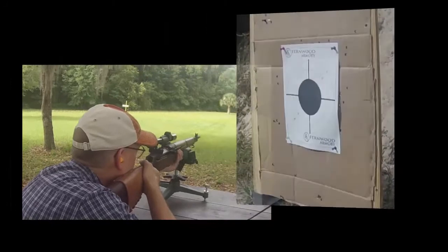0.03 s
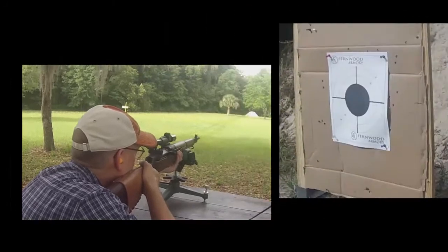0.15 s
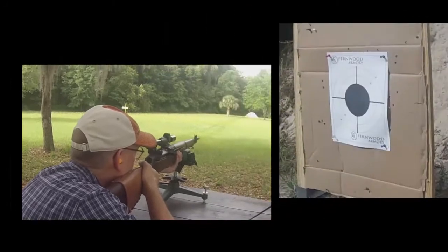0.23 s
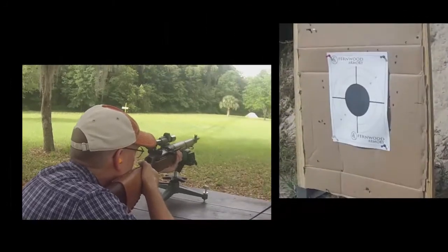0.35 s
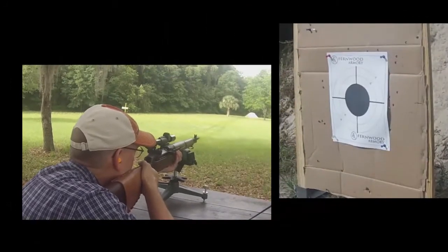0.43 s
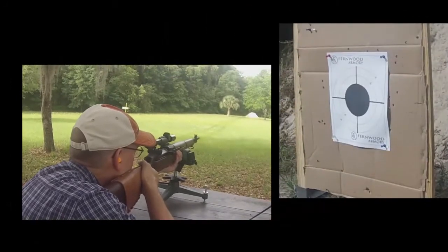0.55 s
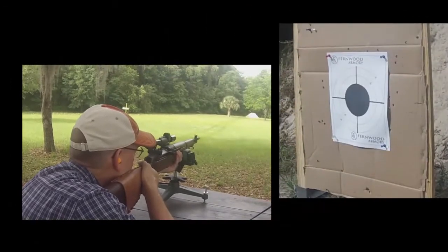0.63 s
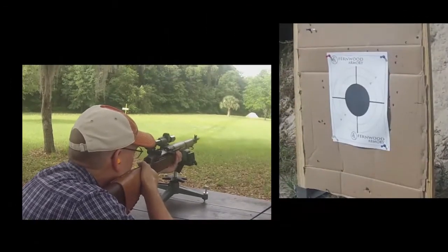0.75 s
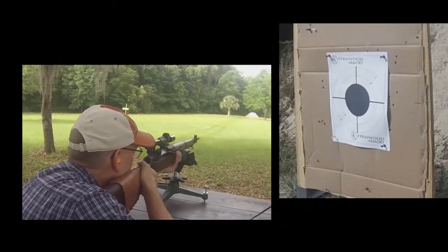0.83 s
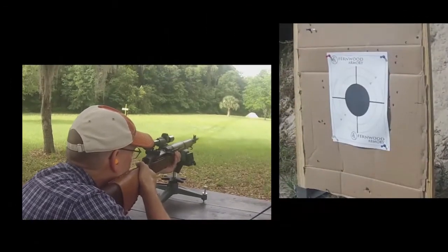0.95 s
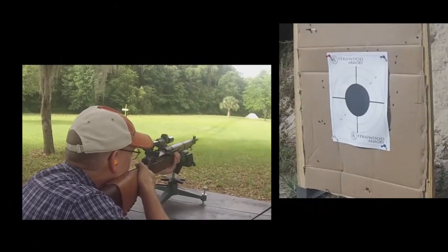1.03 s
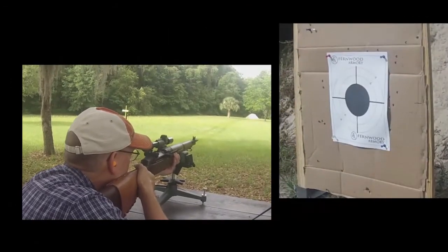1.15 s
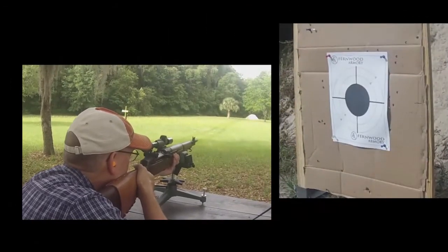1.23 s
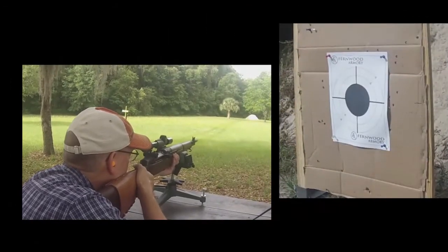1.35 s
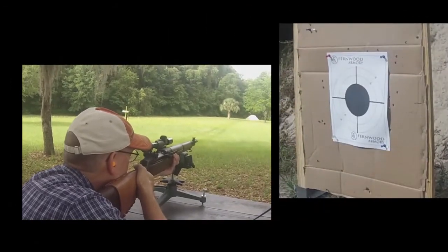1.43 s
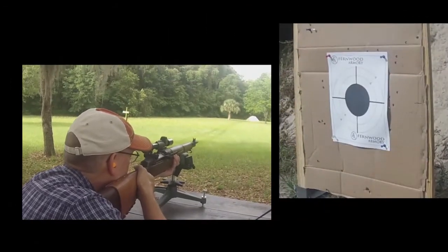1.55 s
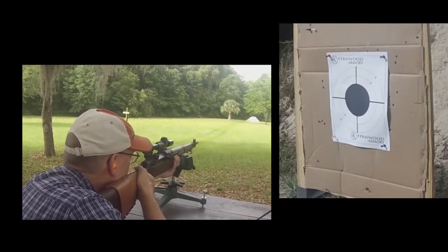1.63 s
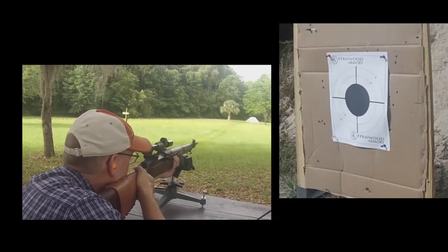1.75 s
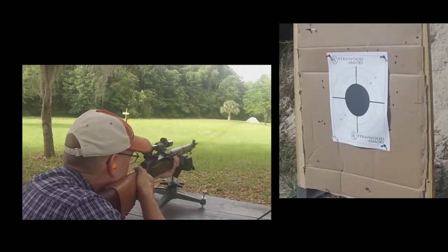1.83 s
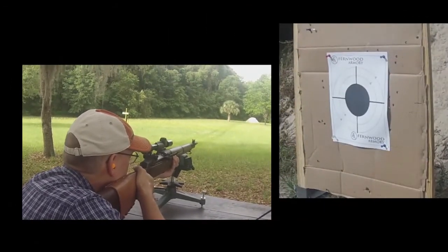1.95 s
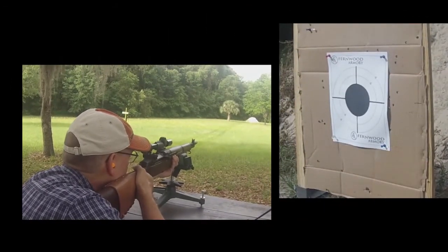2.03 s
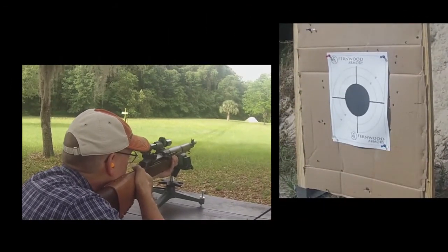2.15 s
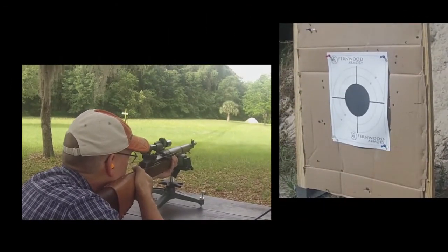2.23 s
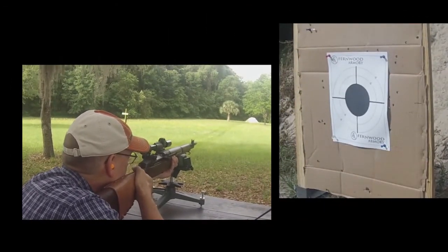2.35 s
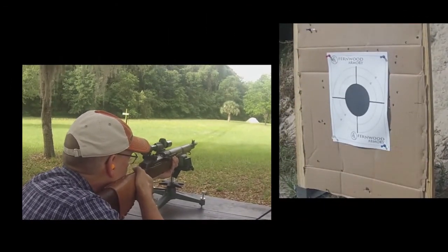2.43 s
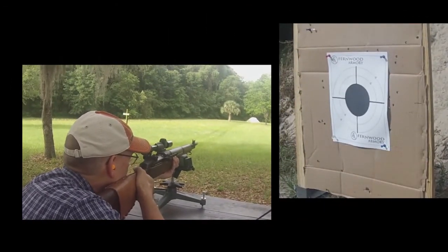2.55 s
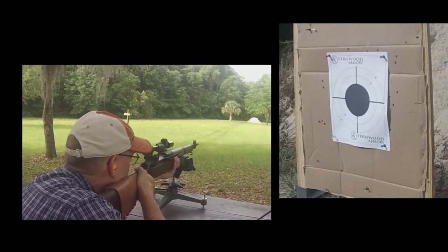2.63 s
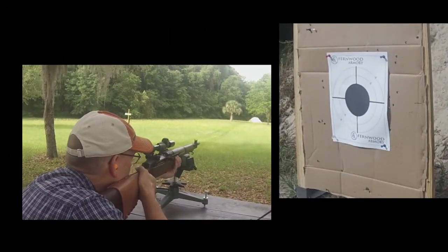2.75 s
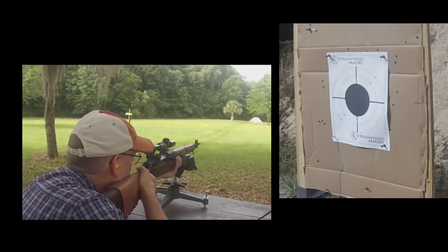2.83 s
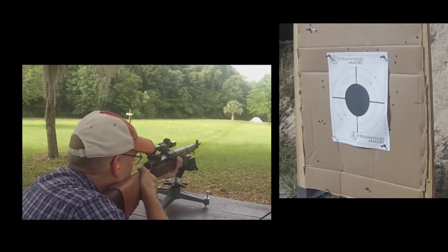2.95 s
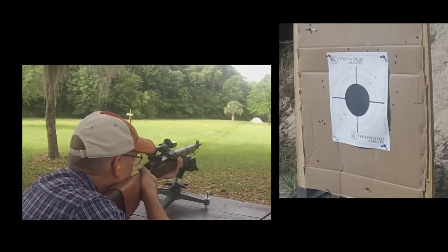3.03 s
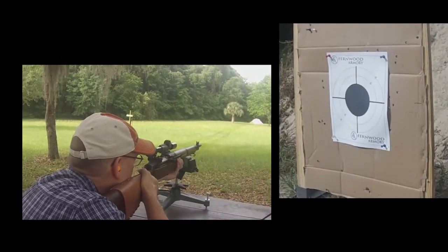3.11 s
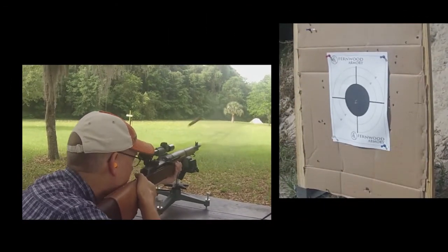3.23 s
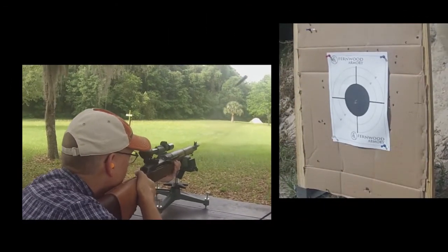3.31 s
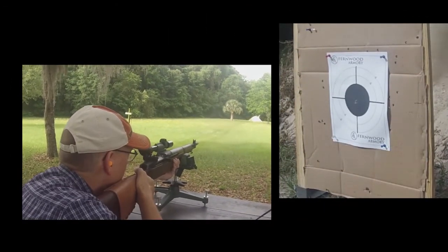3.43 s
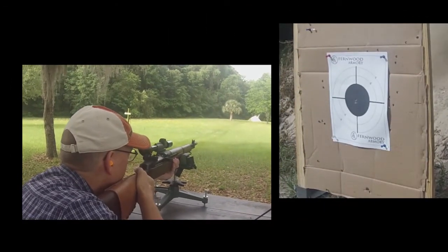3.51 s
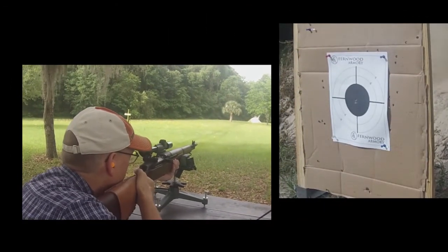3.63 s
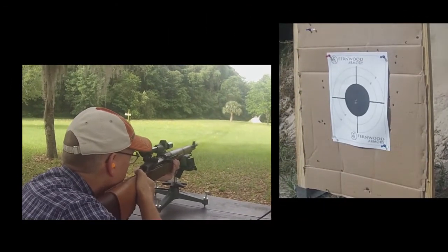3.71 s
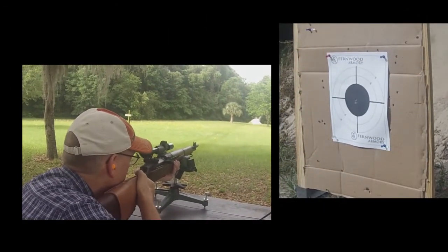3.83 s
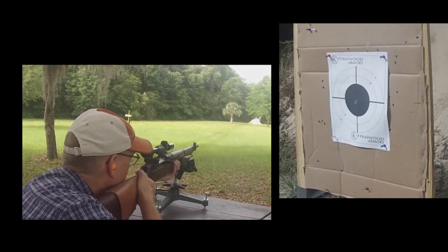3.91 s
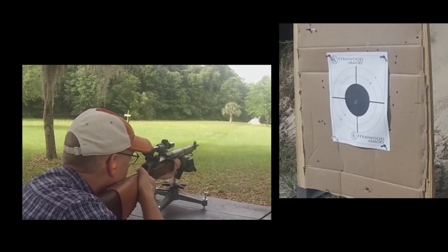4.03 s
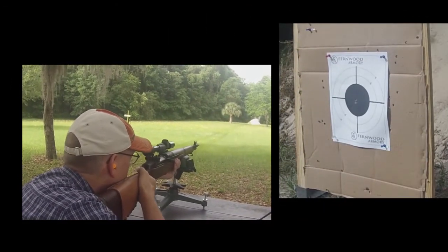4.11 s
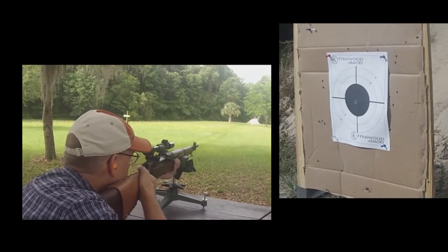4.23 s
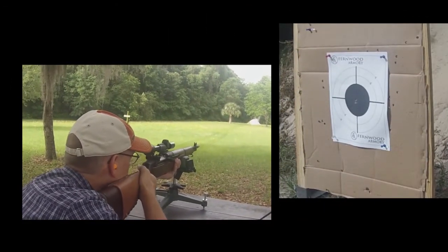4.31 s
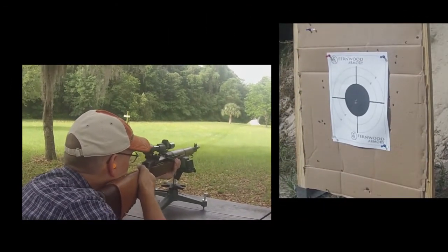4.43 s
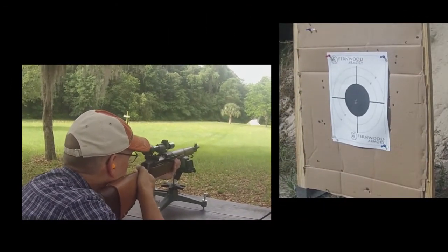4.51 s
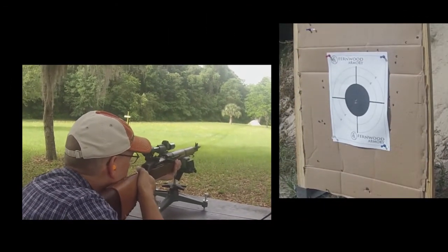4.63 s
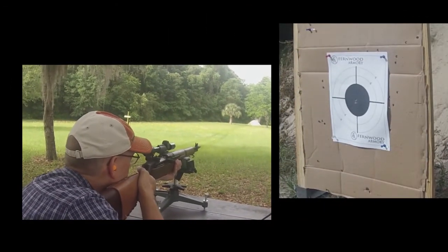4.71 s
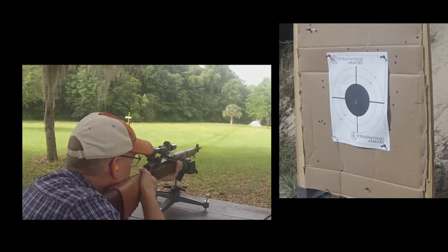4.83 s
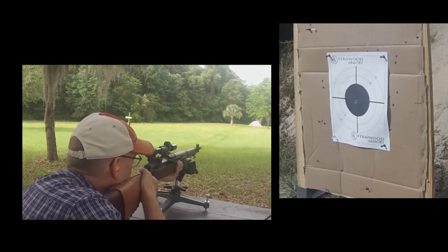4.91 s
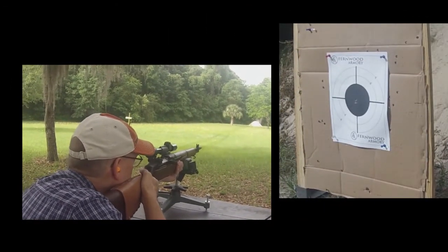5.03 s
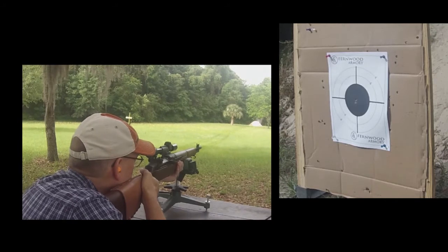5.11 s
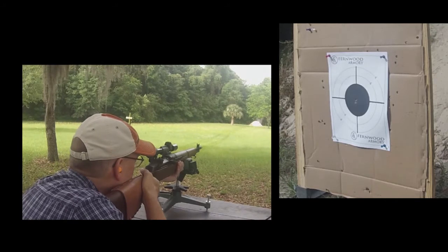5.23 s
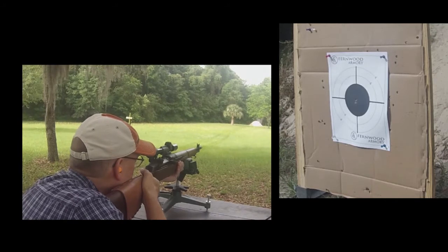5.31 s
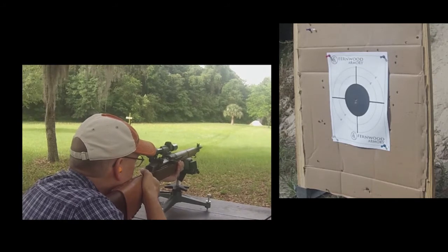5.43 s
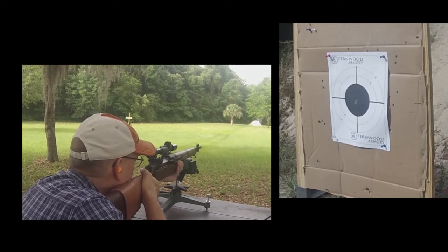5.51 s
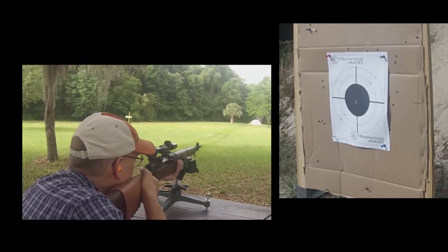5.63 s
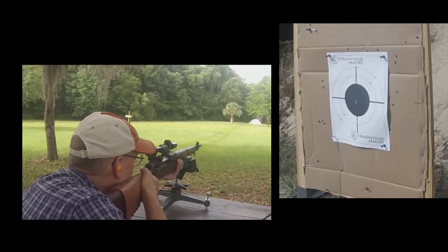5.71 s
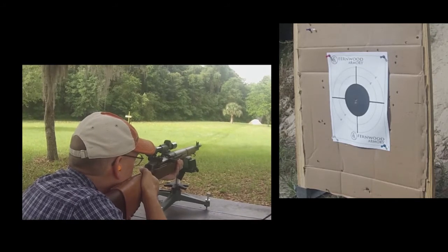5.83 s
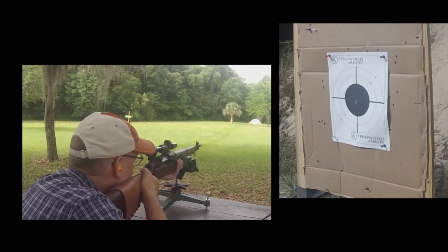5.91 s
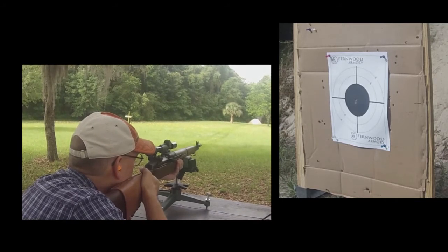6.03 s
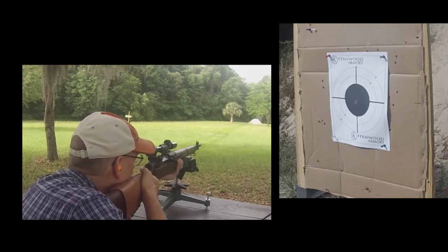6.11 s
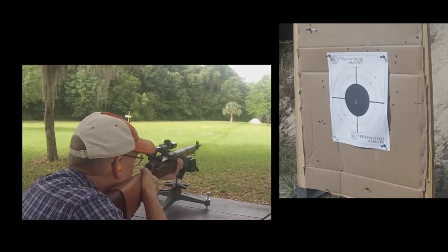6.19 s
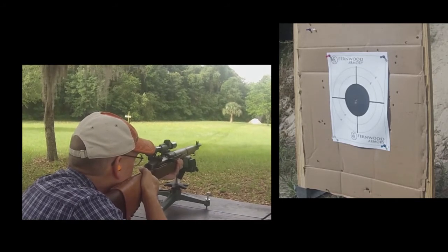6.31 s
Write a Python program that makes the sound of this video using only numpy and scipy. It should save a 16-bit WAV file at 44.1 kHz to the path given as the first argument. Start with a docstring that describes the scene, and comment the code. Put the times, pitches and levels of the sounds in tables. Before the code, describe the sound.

A single rifle shot cracks outdoors and rolls away in a long echo, with faint birdsong before it and small metal clicks after.

```python
"""Rifle shot at an open range

One shot from a bench: the blast overloads the microphone, a sharp crack follows, and the woods
scatter it back in a long roll that the air dulls. Before it a small bird sings and something knocks
on cardboard; the rifle's steel action clicks once before and several times after.
Under it all lie a low rumble, far birds and a faint insect."""
import sys
import numpy as np
from scipy import signal
from scipy.fft import rfft, irfft, next_fast_len
from scipy.io import wavfile

SR = 44100
rng = np.random.default_rng(int(sys.argv[2]) if len(sys.argv) > 2 else 0)


def log_audio(samples):
    """Write samples as a 16-bit WAV file to the path given in sys.argv[1]."""
    # one column per channel
    frames = np.atleast_2d(samples).T
    # limit to full scale, then quantise
    limited = np.clip(frames, -1, 1)
    pcm = np.round(limited * 32767).astype(np.int16)
    wavfile.write(sys.argv[1], SR, pcm)


N = 280476
T = np.arange(N) / SR
BURST_SAMPLES = SR // 4


def undb(db):
    """Decibels to gain."""
    return 10 ** (np.asarray(db) / 20)


def colour(x, points):
    """Filter by a (Hz, dB) spectrum, rolled off below 20 Hz, keeping the power of white noise."""
    hz, db = np.transpose(points)
    size = next_fast_len(len(x))
    f = np.maximum(np.fft.rfftfreq(size, 1 / SR), 1)
    gain = undb(np.interp(np.log(f), np.log(hz), db)) * f / np.hypot(f, 20)
    return irfft(rfft(x, size) * gain / np.sqrt(np.mean(gain ** 2)), size)[:len(x)]


def noise(points, size=BURST_SAMPLES):
    """Unit-level noise with a (Hz, dB) spectrum."""
    return colour(rng.standard_normal(size), points)


def walk(rate_hz):
    """Smooth random curve, spread near 1."""
    knots = rng.standard_normal(1024)
    return np.interp(T * rate_hz, np.arange(len(knots)), knots)


def fade(decay_ms, size=BURST_SAMPLES):
    """Exponential decay."""
    return np.exp(-T[:size] * 1000 / decay_ms)


def ring(modes):
    """Response of (frequency [Hz], level [dB], t60 [s]) modes to one blow."""
    t = T[:BURST_SAMPLES]
    return sum(undb(db - 60 * t / t60_s) * np.sin(2 * np.pi * hz * t) for hz, db, t60_s in modes)


def add(out, start_s, sound):
    """Mix a sound in at start_s."""
    i = int(start_s * SR)
    out[i:i + len(sound)] += sound[:N - i]


def field(level_db=-54, split_hz=260):
    """A low rumble stirs slightly under an even distant hiss."""
    # outdoor background: (frequency [Hz], relative density [dB])
    spectrum = [(12, -34.5), (20, 1.5), (180, -4.5), (259, -10), (306, -10.5), (342, -12.5), (404, -12),
                (505, -15.5), (549, -15.5), (788, -17.5), (906, -17), (1070, -20), (5090, -29.5),
                (11100, -37), (15500, -46.5)]
    air = undb(level_db) * noise(spectrum, N)
    rumble = signal.sosfiltfilt(signal.butter(2, split_hz, fs=SR, output="sos"), air)
    hiss = air - rumble
    return rumble * undb(.9 * walk(9)) + hiss * undb(.3 * walk(3))


def insect(pitch_hz=11383, waver_hz=120, pulse_hz=6, level_db=-82):
    """A thin high chirp in uneven pulses."""
    turns = pulse_hz * T + .3 * walk(3)
    tone = np.sin(2 * np.pi * np.cumsum(pitch_hz + waver_hz * walk(146.8)) / SR)
    return undb(level_db) * tone * np.maximum(np.sin(2 * np.pi * turns), 0)


def note(length_s, hz, glide_oct, bend_hz, arch=0):
    """A gliding tone and its rounded swell; arch makes the glide start fast and level off."""
    u = np.linspace(0, 1, int(length_s * SR))
    pitch_hz = hz * 2 ** (glide_oct * (u - .5 - 2 * arch * (u - .5) ** 2)) + bend_hz
    tone = np.sin(2 * np.pi * np.cumsum(pitch_hz) / SR)
    swell = np.sqrt(2 * np.abs(np.sin(np.pi * u)))
    return tone, swell


def whistle(length_s, hz, glide_oct, waver=.00803, arch=0):
    """A clear note that wavers slightly."""
    bend_hz = waver * hz * walk(147)[:int(length_s * SR)]
    tone, swell = note(length_s, hz, glide_oct, bend_hz, arch)
    return swell * tone


def buzz(length_s, hz, trill_hz, depth_hz, glide_oct=0, rise_db=0, rasp_db=-12):
    """A raspy note whose trill widens and firms up as it goes."""
    size = int(length_s * SR)
    u = T[:size] / length_s
    turns = np.cumsum(trill_hz * (1 + .2 * walk(60)[:size])) / SR
    bend = np.sqrt(u) * signal.sawtooth(2 * np.pi * turns, .25) + .3 * walk(500)[:size]
    tone, swell = note(length_s, hz, glide_oct, depth_hz * bend)
    rasp = noise([(.68 * hz, -40), (.8 * hz, -4), (hz, 0), (1.12 * hz, -7), (1.3 * hz, -40)], size)
    firmness = np.minimum(1, .5 + turns / 6)
    return swell * undb(rise_db * (u - .5)) * (firmness * tone + undb(rasp_db) * rasp)


def foliage(x, direct_db, wet_db, t60_s=.38):
    """A sound and its short scatter off the leaves."""
    leaves = rng.standard_normal(SR) * undb(-60 * T[:SR] / t60_s)
    scatter = signal.fftconvolve(x, leaves / np.linalg.norm(leaves))[:N]
    return undb(direct_db) * x + undb(wet_db) * scatter


def far_birds(call_hz=2848, rise_s=.11, fall_s=.047, call_oct=.15):
    """Single whistles and a two-note call from deep in the trees."""
    # whistles: (time [s], length [s], pitch [Hz], glide [oct], level [dB])
    whistles = [(0, 0.062, 2700, -0.24, -64), (.58, 0.1, 3793, 0.25, -67), (5.23, 0.265, 3320, -0.019, -70),
                (5.735, .09, 3980, 0.24, -67), (5.83, .15, 3550, .38, -64.5)]
    # calls, a slow rise then a quick fall: (time [s], level [dB])
    calls = [(.15, -64.5), (0.426, -63.5)]
    out = np.zeros(N)
    for s, length_s, hz, glide_oct, db in whistles:
        add(out, s, undb(db) * whistle(length_s, hz, glide_oct))
    for s, db in calls:
        add(out, s, undb(db) * whistle(rise_s, call_hz, call_oct, waver=.014))
        add(out, s + rise_s, undb(db) * whistle(fall_s, .93 * call_hz, -call_oct, waver=.013))
    return foliage(out, direct_db=-4, wet_db=-2)


def near_bird(trill_start_s=1.283):
    """One song: buzzes that grow louder, a high trill over a fainter second voice, then chirps."""
    # opening buzzes: (time [s], length [s], level [dB])
    buzzes = [(0.247, .04, -62.5), (0.401, .235, -59.5), (0.68, .21, -55), (0.966, 0.27, -51)]
    # closing chirps: (time [s], length [s], pitch [Hz], glide [oct], level [dB])
    chirps = [(1.537, 0.0163, 7270, .18, -48.5), (1.571, 0.022, 6700, .04, -47.5),
              (1.609, 0.015, 5570, 0.29, -50.5), (1.643, .028, 5120, 0.2, -54.5),
              (1.672, 0.0405, 4713, -0.094, -60), (1.70, 0.0165, 6950, 0.38, -56),
              (1.715, 0.028, 7060, .06, -45)]
    out = np.zeros(N)
    for s, length_s, db in buzzes:
        rising = buzz(length_s, hz=5770, trill_hz=48, depth_hz=547, glide_oct=.1, rise_db=6)
        add(out, s, undb(db) * rising)
    add(out, trill_start_s, undb(-47) * buzz(length_s=.23, hz=7340, trill_hz=135, depth_hz=404))
    add(out, trill_start_s, undb(-60) * buzz(length_s=.126, hz=5970, trill_hz=135, depth_hz=404))
    for s, length_s, hz, glide_oct, db in chirps:
        add(out, s, undb(db) * whistle(length_s, hz, glide_oct, waver=.014, arch=.25))
    return foliage(out, direct_db=-2, wet_db=-4)


def knock(ring_db=-21, tick_db=-35, tick_ms=3.7, highpass_hz=280):
    """A light tap rings a cardboard sheet, too small to radiate bass."""
    # cardboard modes: (frequency [Hz], level [dB], t60 [s])
    card_modes = [(346, -9.5, 0.0387), (476, -0.5, 0.032), (647, -5, 0.034), (2120, -4.5, 0.0077),
                  (2800, -9, 0.0113), (3660, -20.5, 0.0078)]
    out = np.zeros(N)
    tick = noise([(1200, -4), (2800, 7), (5000, -8), (10000, -19), (15000, -42)])
    add(out, 1.1019, undb(tick_db) * tick * fade(tick_ms))
    add(out, 1.1025, undb(ring_db) * ring(card_modes))
    return signal.sosfilt(signal.butter(6, highpass_hz, "high", fs=SR, output="sos"), out)


def rifle_action(ring_db=-19, catch_db=3):
    """Steel parts snap and ring thinly, and scrape as they slide."""
    # clicks: (time [s], level [dB], decay [ms], hollow body re snap [dB])
    clicks = [(2.859, -55.5, 1.9, 11), (4.151, -41.5, 4.9, 1.5), (4.1565, -31.5, 2.3, 2),
              (4.388, -63.5, 4.75, -3)]
    # sliding parts: (time [s], length [s], level [dB])
    slides = [(2.867, .04, -64), (4.168, .07, -54), (4.318, 0.28, -65), (4.528, 0.076, -63),
              (5.344, 0.039, -69)]
    # steel modes: (frequency [Hz], level [dB], t60 [s])
    steel_modes = [(6158, -16, .3), (8150, -11, .12), (9706, -8, .5), (11430, -22, .15), (14310, -19, .12)]
    # snap and scrape: (frequency [Hz], relative density [dB])
    snap_spectrum = [(500, 6.5), (4500, -3.5), (7500, 0), (11000, -7.5), (15000, -8.5)]
    # hollow body: (frequency [Hz], relative density [dB])
    body_spectrum = [(600, -12), (1800, 6.5), (3200, 5), (4200, -6.5), (10000, -36.5)]
    out = np.zeros(N)
    for s, db, decay_ms, body_db in clicks:
        snap = noise(snap_spectrum) + undb(body_db) * noise(body_spectrum)
        add(out, s, undb(db) * snap * fade(decay_ms))
        add(out, s, undb(db + ring_db) * ring(steel_modes))
    pressure = sum(undb(db) * np.interp(T, [s, s + length_s / 4, s + length_s], [0, 1, 0])
                   for s, length_s, db in slides)
    scrape = pressure * undb(catch_db * walk(120)) * noise(snap_spectrum, N)
    return out + scrape


def path_loss(x, start_s, air_db_per_s=.84, ground_db_per_s=5, ground_hz=420):
    """Air takes the treble and turf the bass, so later returns narrow to a mid band."""
    hz, t, frames = signal.stft(x, SR, nperseg=512)
    db_per_s = air_db_per_s * (hz / 1000) ** 1.782 + ground_db_per_s / (1 + (hz / ground_hz) ** 4)
    loss_db = np.outer(db_per_s, np.maximum(t - start_s, 0))
    return signal.istft(frames * undb(-loss_db), SR)[1][:N]


def woods_roll(fade_db_per_s=15, grain_db=2.5, patch_db=2, settle_s=.4, thump_db=-35, thump_ms=100):
    """Countless trunks return the blast, stand after stand; a deep thump lingers briefly."""
    # stands of trees, near to far: (first return [s], level [dB], build-up [s])
    stands = [(3.219, -28, 0.0069), (3.42, -23.5, 0.099), (4.1, -36, 0.26), (5.45, -52, .15)]
    # single echoes off nearby trees: (time [s], level [dB], decay [ms])
    echoes = [(3.2368, -23, 11), (3.275, -31.5, 8.6), (3.326, -27, 4), (3.37, -23, 3.5),
              (3.3888, -19.5, 4.3), (3.410, -24.5, 2.7), (3.437, -22.5, 2.5), (3.467, -24.5, 4),
              (3.568, -25, 7), (3.806, -28, 8)]
    # roll before path loss: (frequency [Hz], relative density [dB])
    spectrum = [(30, -27.5), (65, -7.5), (120, -0.5), (200, -5.5), (290, -11), (450, -1.5), (780, 3.5),
                (1000, 0), (1300, -10), (2700, -7), (4000, -14), (6000, -19), (8500, -13), (11000, -20.5),
                (12200, -17.5), (15000, -28.5)]
    start_s = stands[0][0]
    power = np.zeros(N)
    for s, db, rise_s in stands:
        build_up = np.clip((T - s) / rise_s, 0, 1)
        power += build_up * undb(db - fade_db_per_s * np.maximum(T - s - rise_s, 0)) ** 2
    grain = np.repeat(rng.standard_normal(N // 20 + 1), 20)[:N]
    # returns crowd together with time, so the patches smooth out
    sparseness = np.exp(-np.maximum(T - start_s, 0) / settle_s)
    returns = rng.standard_normal(N) * np.sqrt(power)
    returns *= undb(grain_db * grain + patch_db * sparseness * walk(70))
    for s, db, decay_ms in echoes:
        thud = noise([(100, -1), (250, -1.5), (500, 1), (1000, -4), (3000, -10.5), (10000, -17.5)])
        add(returns, s, undb(db) * thud * fade(decay_ms))
    out = path_loss(colour(returns, spectrum), start_s)
    thump = noise([(25, -2.5), (50, -2), (120, -4.5), (400, -33.5), (2000, -76)], N)
    add(out, start_s, undb(thump_db) * thump * fade(thump_ms, N))
    return out


def crack(ring_db=8, hiss_db=-8, hiss_ms=2.9, splash_db=-17, splash_ms=6):
    """A hard ring, a burst of hiss and a short splash."""
    # ring of the crack: (frequency [Hz], level [dB], t60 [s])
    modes = [(2230, -7, 0.014), (2860, -8, .01), (5460, 1, 0.0055), (6250, -10.5, .007)]
    bright = noise([(300, -5), (2300, 1), (4000, -7.5), (6000, 0), (8000, -10.5), (15000, -37.5)])
    burst = np.exp(-(1000 * T[:BURST_SAMPLES] / hiss_ms) ** 4)
    envelope = undb(hiss_db) * burst + undb(splash_db) * fade(splash_ms)
    return undb(ring_db) * ring(modes) + bright * envelope


def shot(striker_db=-33, striker_ms=3.6, front_ms=.3):
    """The striker falls; each blast arrival is a pressure pulse with a roar of gas; a crack ends it."""
    # muzzle blast, nearest reflections: (time [s], pulse [dB], push [ms], roar [dB], roar decay [ms])
    arrivals = [(3.2032, -2.5, .5, -8, 4), (3.2058, 10, 0.65, 10, 2), (3.21, -13, 1.0, -24, 1.8)]
    # short resonances that colour the blast: (frequency [Hz], level [dB], t60 [s])
    blast_modes = [(293.2, -12.5, 0.042), (404, -13.5, 0.046), (618, -5, 0.02), (774, -4.5, 0.015),
                   (895, -9.5, 0.023), (1106, -5, 0.022), (1520, -22, .035), (1889, -24, 0.063),
                   (3460, 2, 0.0035)]
    # gas roar: (frequency [Hz], relative density [dB])
    roar_spectrum = [(40, 0.5), (200, -9), (450, 2.5), (1000, 4), (1500, -11.5), (2400, -6.5), (3500, 2),
                     (4600, -19), (8500, -11.5), (15000, -33)]
    out = np.zeros(N)
    striker = noise([(300, -4.5), (800, 3), (2000, 3), (4500, -1), (6500, -22.5), (14000, -24)])
    add(out, 3.1942, undb(striker_db) * striker * fade(striker_ms))
    for s, pulse_db, push_ms, roar_db, roar_ms in arrivals:
        pulse = np.gradient(T[:BURST_SAMPLES] * fade(push_ms)) * SR  # overpressure, then suction
        front = 1 - fade(front_ms)
        add(out, s, -undb(pulse_db) * (pulse + ring(blast_modes)) * front)
        add(out, s, undb(roar_db) * noise(roar_spectrum) * fade(roar_ms))
    add(out, 3.2172, crack())
    return out


def scene():
    """All sources at one microphone."""
    mix = shot() + woods_roll() + knock() + rifle_action() + field() + insect()
    return (mix + near_bird() + far_birds())[None]


def record(dry, ceiling=.94, lowpass_hz=15300):
    """The blast clips flat; a steep low-pass cuts the top."""
    lowpass = signal.ellip(8, .1, 60, lowpass_hz, fs=SR, output="sos")
    return signal.sosfiltfilt(lowpass, np.clip(dry, -ceiling, ceiling))


dry = scene()
out = record(dry)
log_audio(out)
```